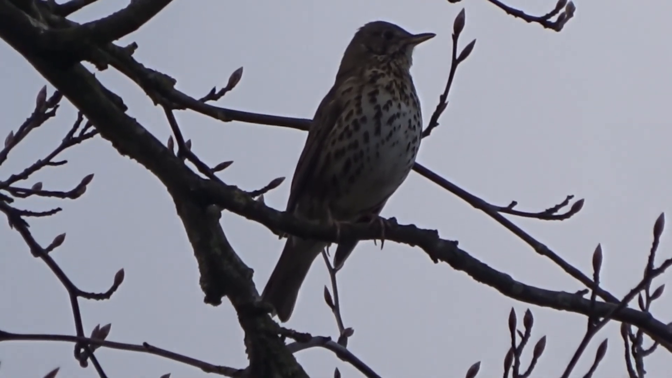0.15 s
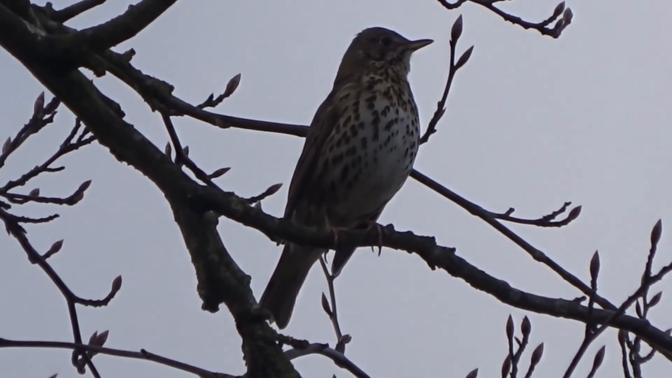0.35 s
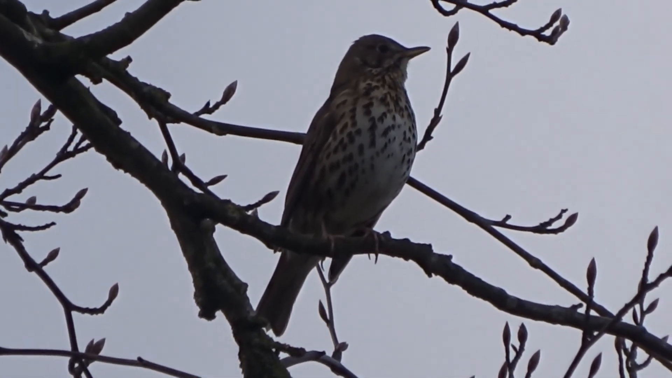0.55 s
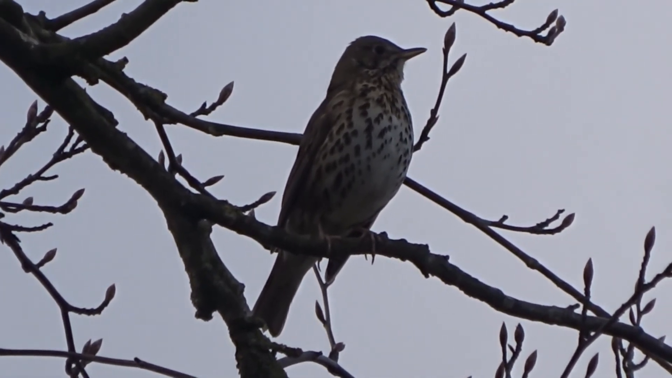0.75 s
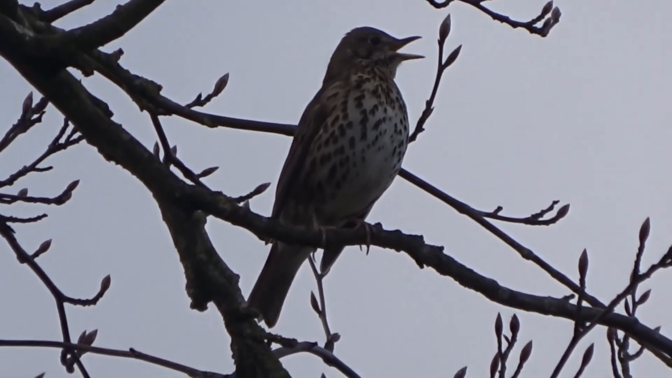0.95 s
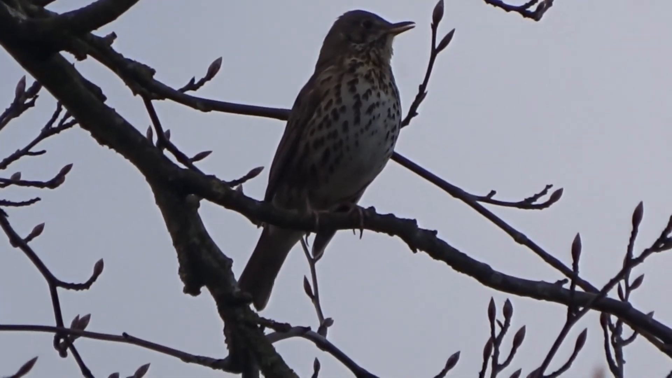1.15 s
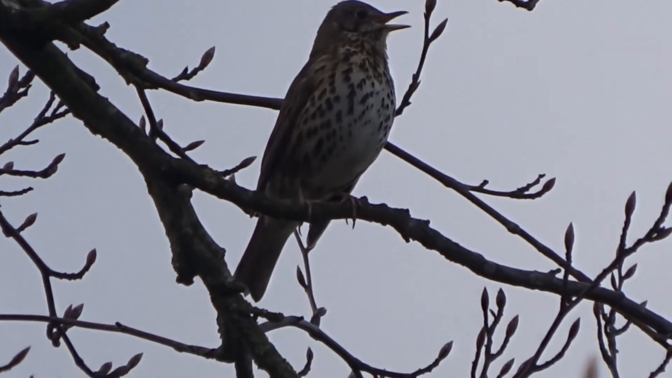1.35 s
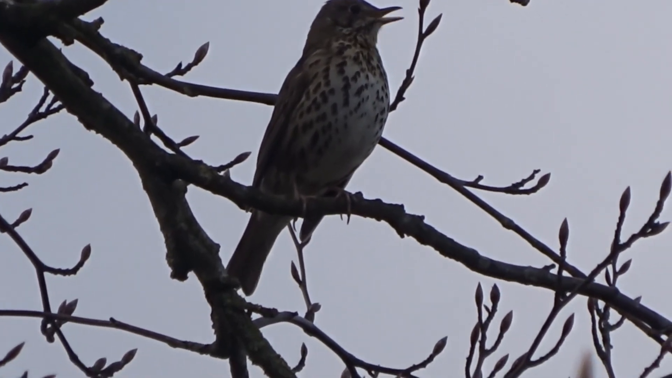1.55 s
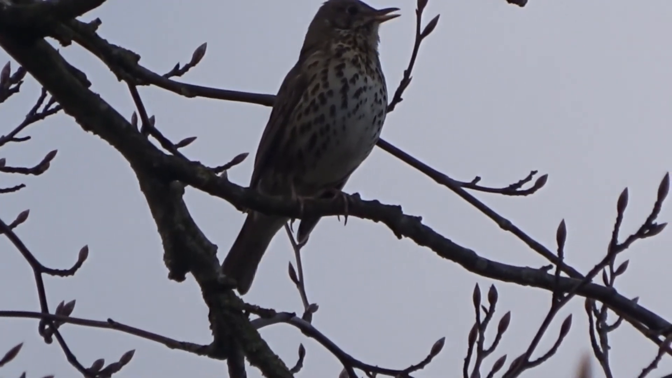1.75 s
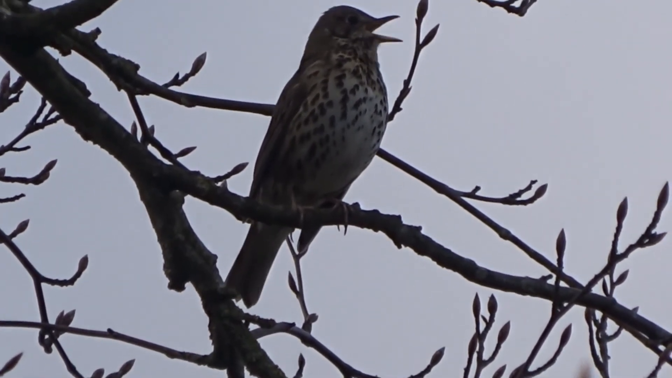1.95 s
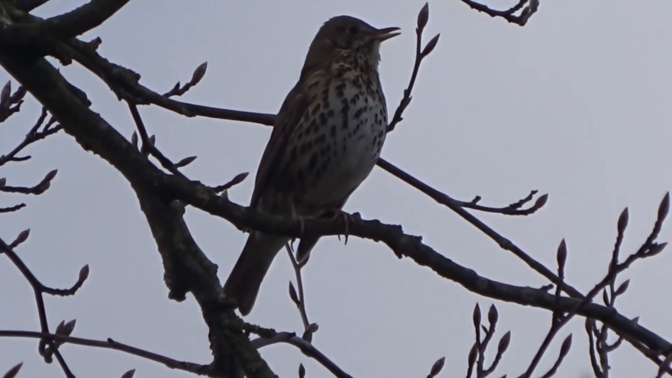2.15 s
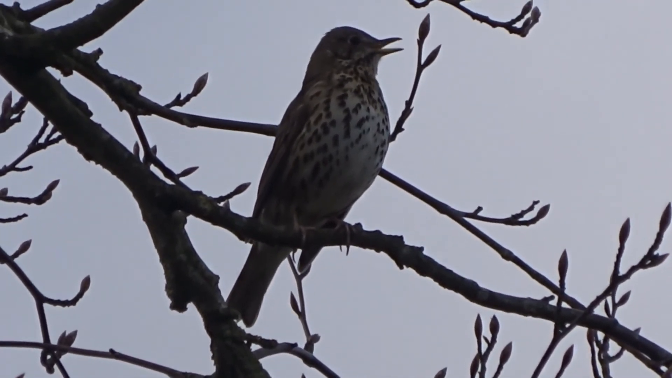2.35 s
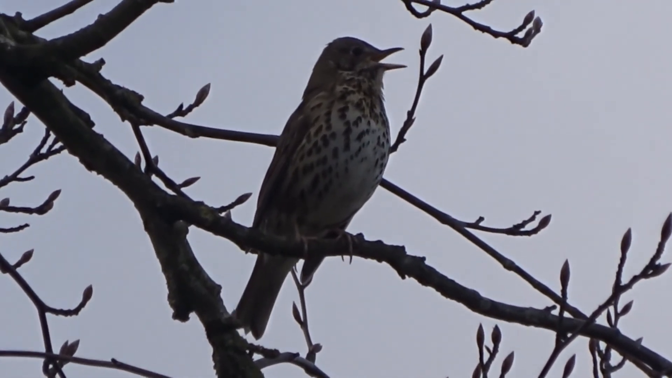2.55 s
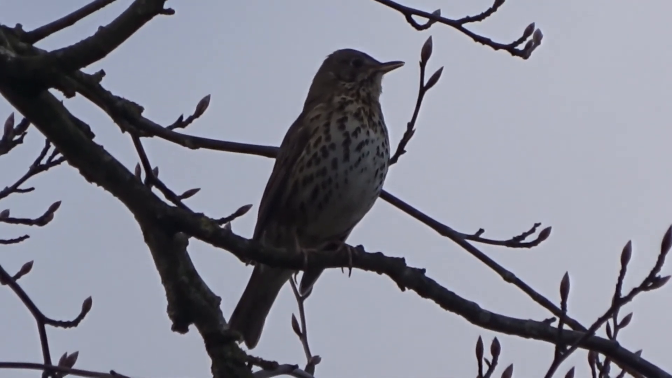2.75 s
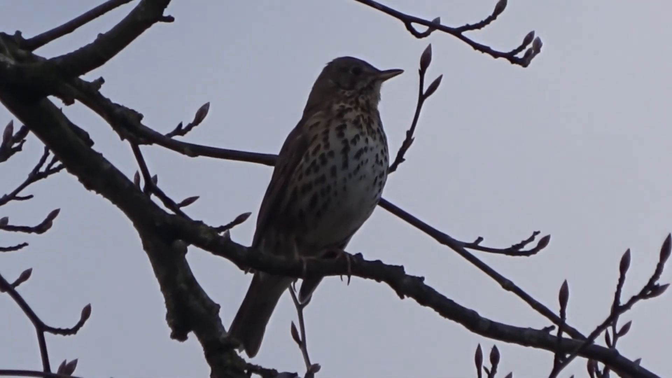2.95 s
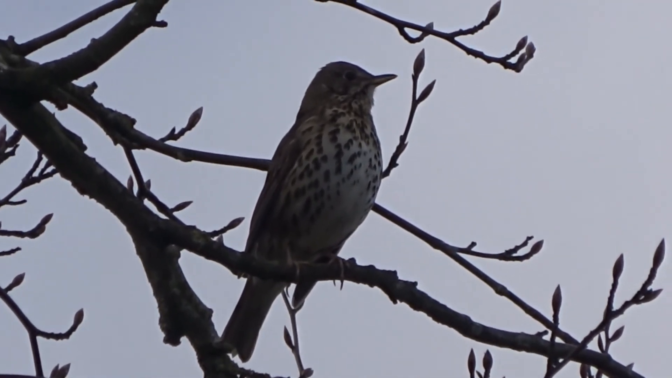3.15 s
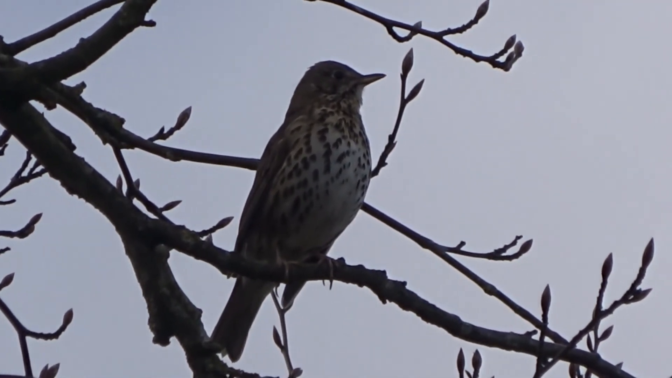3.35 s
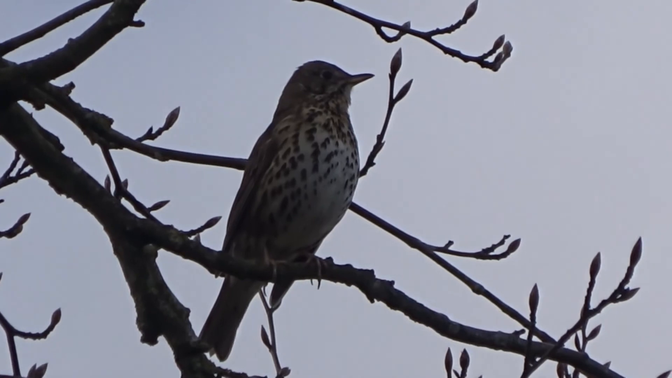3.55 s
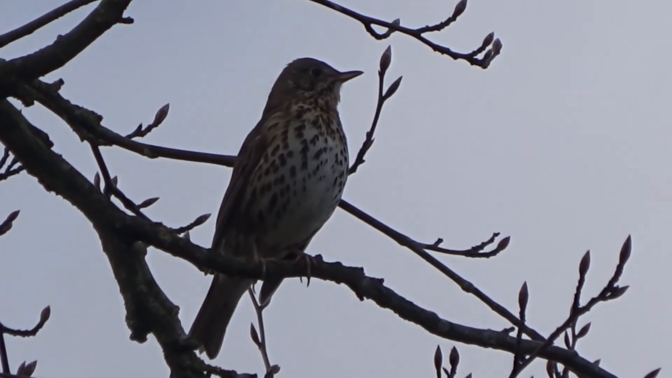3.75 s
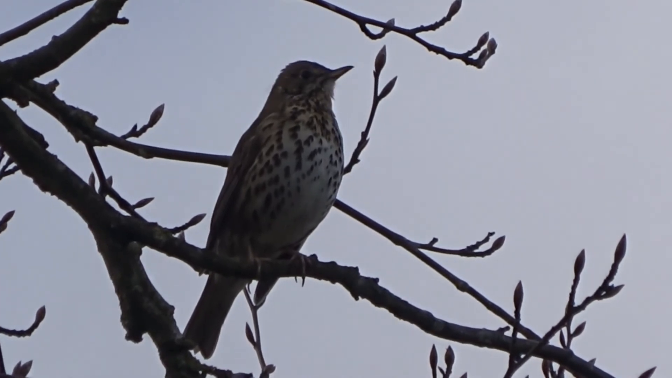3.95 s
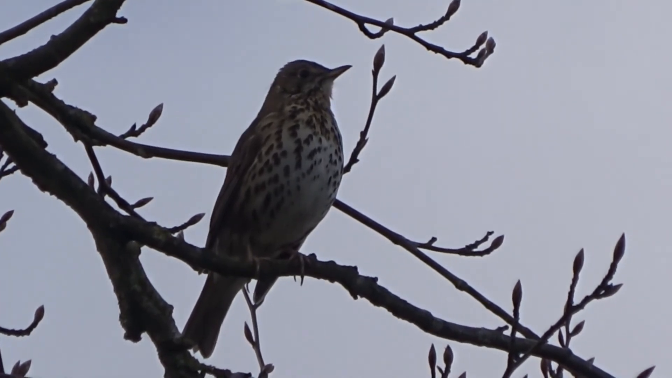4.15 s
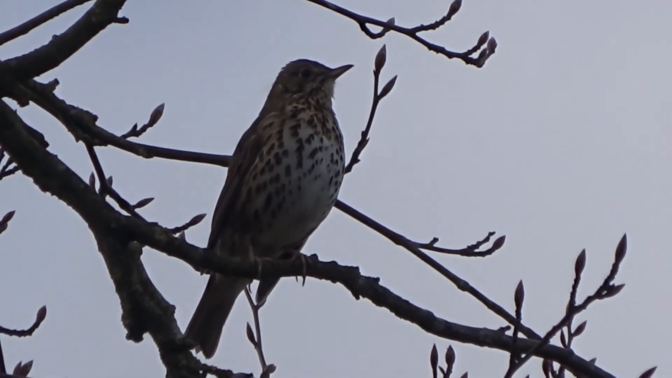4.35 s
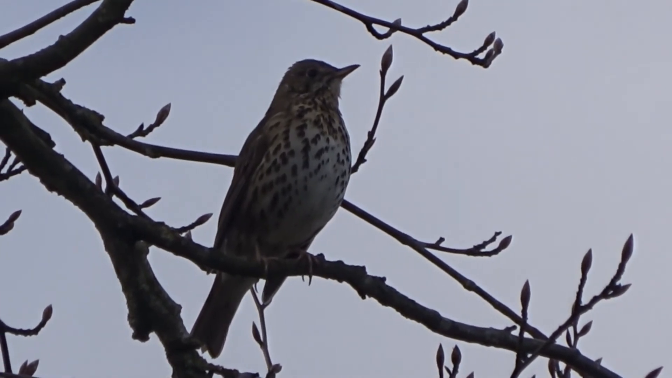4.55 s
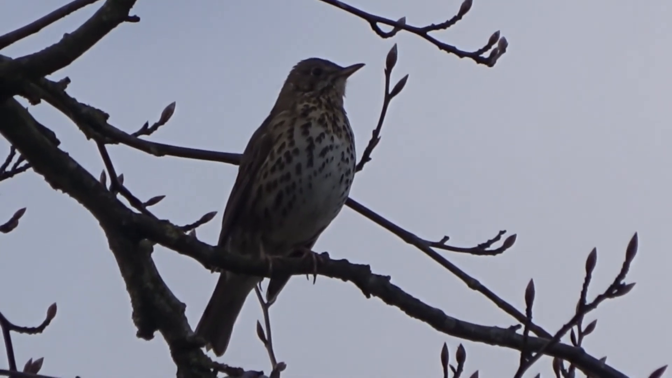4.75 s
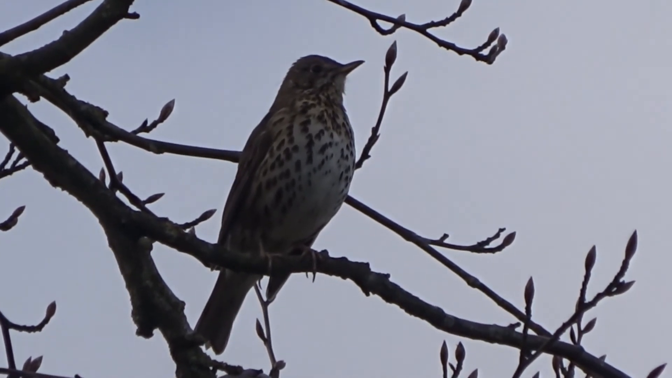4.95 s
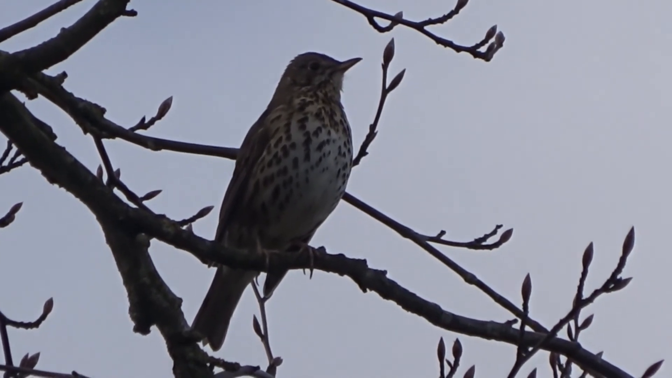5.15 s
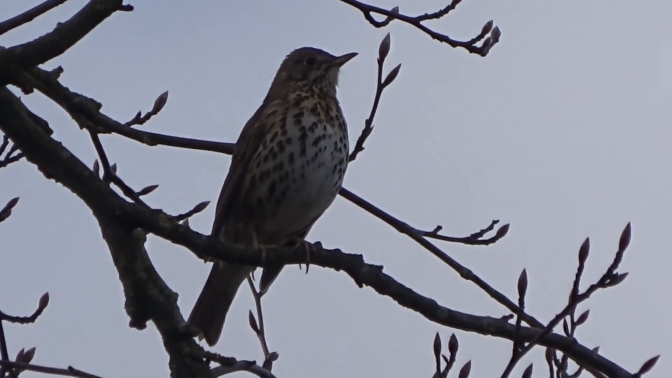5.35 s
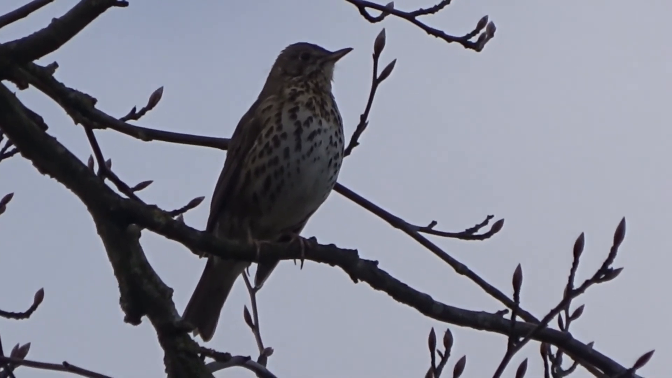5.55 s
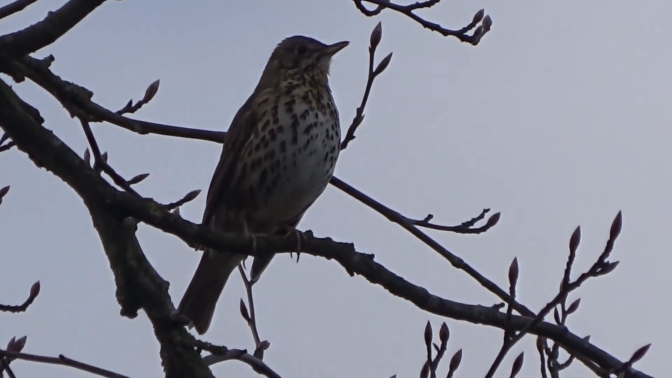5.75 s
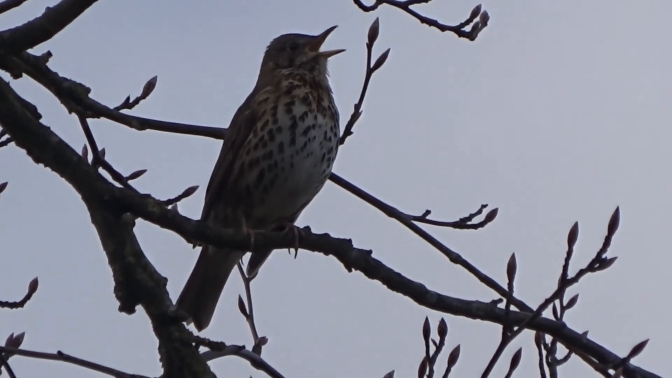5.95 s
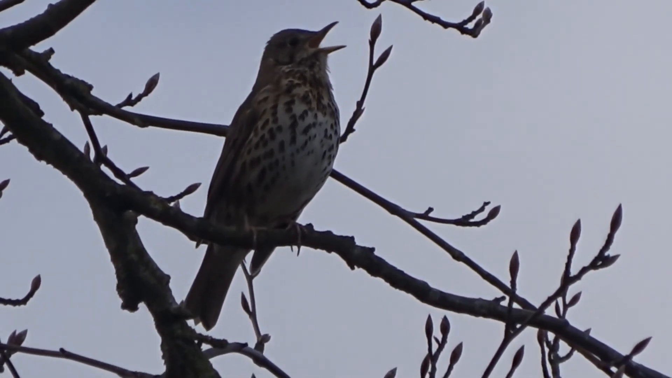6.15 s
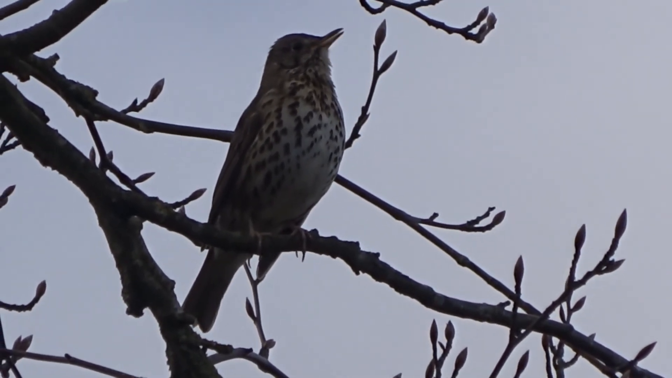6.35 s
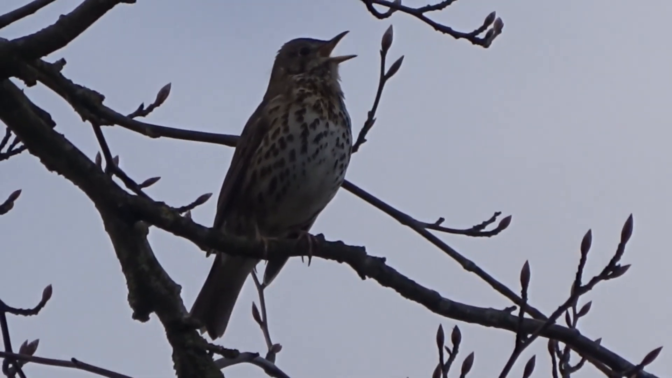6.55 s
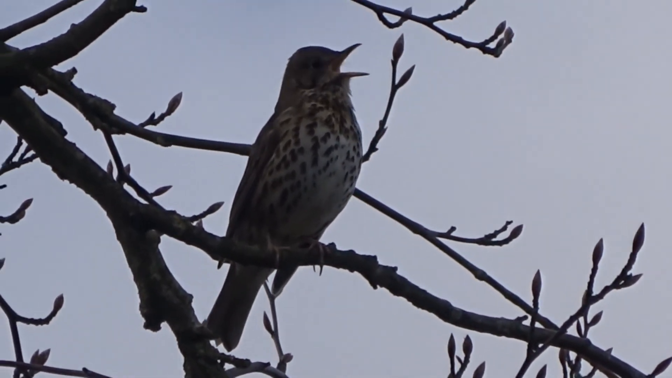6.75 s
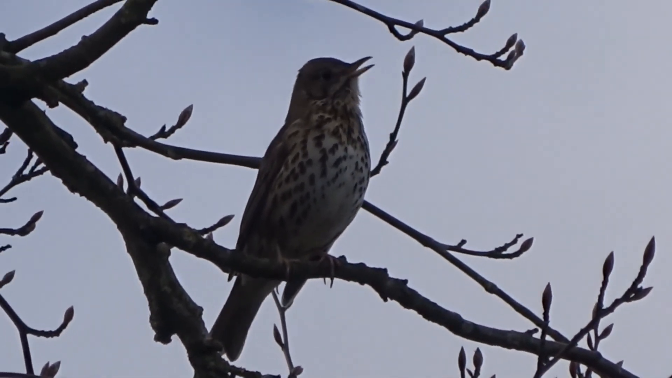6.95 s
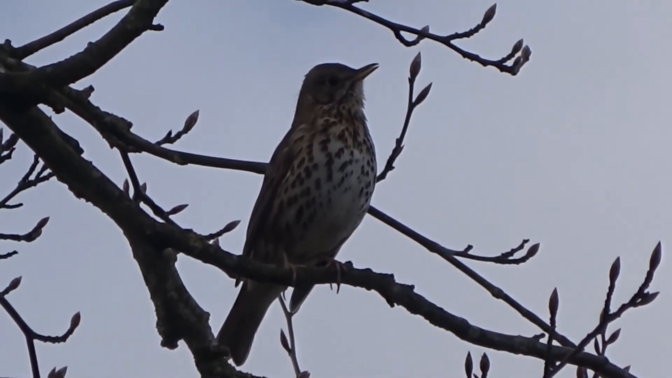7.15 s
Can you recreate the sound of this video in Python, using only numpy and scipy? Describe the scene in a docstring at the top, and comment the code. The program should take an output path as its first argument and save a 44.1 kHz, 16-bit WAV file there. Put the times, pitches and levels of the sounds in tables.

```python
"""A song thrush sings close by: two buzzing slurs, three sharp 'tew' notes, two long whistles,
from a two-sided syrinx whose pure tones gain overtones in throat and beak.
Other songbirds chirp as short glides and rattle as pulsed noise further off, and something snaps once.
Sparse noise echoes make the trees, over the shaped-noise hiss of distant traffic.
The camera cuts the bass and the very top, and whines faintly."""
import sys
import numpy as np
from scipy import signal
from scipy.fft import rfft, irfft
from scipy.io import wavfile
from scipy.ndimage import uniform_filter1d

SR = 44100
rng = np.random.default_rng(int(sys.argv[2]) if len(sys.argv) > 2 else 0)


def log_audio(samples):
    """Write samples as a 16-bit WAV file to the path given in sys.argv[1]."""
    # one column per channel
    frames = np.atleast_2d(samples).T
    # limit to full scale, then quantise
    limited = np.clip(frames, -1, 1)
    pcm = np.round(limited * 32767).astype(np.int16)
    wavfile.write(sys.argv[1], SR, pcm)


N = 317520
T = np.arange(N) / SR
LEFT_RIGHT = np.array([[1], [-1]])  # sign of a left/right difference in each channel


def undb(db):
    """Amplitude factor of a level in dB."""
    return 10 ** (np.asarray(db) / 20)


def curve(rows, t):
    """Straight lines through rows of (t/s, value)."""
    return np.interp(t, *np.transpose(rows))


def colour(points, hz):
    """Gain at each frequency, from (f/Hz, level/dB) points joined on a logarithmic pitch axis."""
    f, db = np.transpose(points)
    return undb(np.interp(np.log(np.maximum(hz, 1)), np.log(f), db))


def shaped(points, size):
    """Noise of unit rms whose spectrum follows the points."""
    spectrum = rfft(rng.standard_normal(size)) * colour(points, np.fft.rfftfreq(size, 1 / SR))
    x = irfft(spectrum, size)
    return x / x.std()


def wander(t, rate):
    """A random line with a new value rate times a second."""
    u = (t - t[0]) * rate
    count = int(u[-1]) + 2
    return np.interp(u, np.arange(count), rng.standard_normal(count))


def span(start, end):
    """Sample times between two moments, 4 ms at the least."""
    return T[max(int(start * SR), 0):int(max(end, start + .004) * SR)]


def add(track, t, x):
    """Mix x into the track at the times t."""
    track[np.rint(t * SR).astype(int)] += x


def turn(hz):
    """Running phase of a moving pitch."""
    return 2 * np.pi * np.cumsum(hz) / SR


def swell(t, attack_s, release_s):
    """Amplitude that rises, holds and falls over the times t."""
    return np.clip(np.minimum((t - t[0]) / attack_s, (t[-1] - t) / release_s), 0, 1)


def background(air_db=-46, drift_db=.5, whine_hz=15625, whine_db=-62):
    """Distant traffic and hiss as slowly drifting wide noise, and the camera's thin whine as a sine."""
    # spectrum of the air, relative: f/Hz, level per Hz/dB
    air_spectrum = [(180, -78), (300, -42.5), (507, -24), (763, -5.5), (991, 2.5), (1620, -0.5),
                    (2480, -8.5), (4320, -11.5), (4770, -13.5), (7300, -19), (14300, -24), (15000, -19.5)]
    # stereo width of the air: f/Hz, side minus mid/dB
    air_width = [(400, -12), (1300, -8), (10000, -20)]
    mid, side = shaped(air_spectrum, N), shaped(air_spectrum, N)
    side = irfft(rfft(side) * colour(air_width, np.fft.rfftfreq(N, 1 / SR)), N)
    air = (mid + side * LEFT_RIGHT) * undb(air_db + drift_db * wander(T, 2.1))
    return air + undb(whine_db) * np.sin(2 * np.pi * whine_hz * T)


def trees(x, wet_db, t60_s, gap_s, likeness, linger_db=-28, linger_t60_s=1.8):
    """Sparse random echoes off trunks and walls die away, duller than the song; far ones linger faintly."""
    t = span(0, 1)
    tail = np.exp(-np.log(1000) * t / t60_s)
    linger = undb(linger_db) * np.exp(-np.log(1000) * t / linger_t60_s)
    fade = (tail + linger) * (t > gap_s)
    # the high power leaves only a few strong grains
    grains = rng.standard_normal((2, len(t))) * rng.random((2, len(t))) ** 20
    mid, side = signal.sosfilt(signal.butter(2, 7500, fs=SR, output="sos"), grains * fade)
    pair = mid + np.sqrt(1 - likeness) * side * LEFT_RIGHT
    pair = pair / np.linalg.norm(grains[0] * fade)
    return undb(wet_db) * signal.fftconvolve(x[None], pair, axes=1)[:, :N]


def near_echo(x, lag_s=0.018, db=-17):
    """One clear reflection from the ground beats against the gliding notes."""
    return undb(db) * np.interp(T - lag_s, T, x, left=0)


def snap(start=2.502, crack_db=-23, crack_s=0.012, tail_db=-31, tail_s=0.16):
    """A dry, bassless crack and its duller scatter among the trunks: one noise under two decays."""
    out, t = np.zeros(N), span(start, start + 1)
    age = t - t[0]
    noise = shaped([(800, -10.5), (2800, 3.0), (6000, -5.0), (10000, -35.0)], len(t))
    dull = signal.sosfilt(signal.butter(1, 3500, fs=SR, output="sos"), noise)
    crack = undb(crack_db) * np.exp(-age / crack_s) * noise
    scatter = undb(tail_db) * np.exp(-age / tail_s) * dull
    add(out, t, crack + scatter)
    return signal.sosfilt(signal.butter(6, 720, "high", fs=SR, output="sos"), out)


def add_slur(track, start, length, from_hz, to_hz, db, rasp_hz, bend, ease=1, taper=.4, fade_db=0,
             flutter_db=2.0, waver=0.033):
    """A short glide, uneven in pitch and strength; ease > 1 starts it gently, bend > 1 ends it gently."""
    t = span(start, min(start + length, T[-1]))
    u = np.linspace(0, 1, len(t))
    glide = (1 - u ** ease) ** bend + waver * wander(t, 110)
    hz = to_hz + (from_hz - to_hz) * glide + rasp_hz * wander(t, 1500)
    level = undb(db - fade_db * u + flutter_db * wander(t, 82))
    add(track, t, level * signal.windows.tukey(len(t), taper) * np.sin(turn(hz)))


def twitter(count=260, level_db=-53, spread_db=3, foot_hz=3200, top_hz=4500, length_s=0.019):
    """Birds further off still: quick faint chirps at random, two in three of them rising."""
    out = np.zeros(N)
    for when, slow, high, way, loud in rng.random((count, 5)):
        length = length_s * (.5 + slow)
        start = when * (T[-1] - length)
        ends = np.array([foot_hz, top_hz]) * 2 ** ((high - .5) / 2)  # up to a quarter octave either way
        ends = ends if way < 2 / 3 else ends[::-1]
        db = level_db + spread_db * (2 * loud - 1)
        add_slur(out, start, length, *ends, db, rasp_hz=50, bend=1.82)
    return out


def second_thrush():
    """Deep among the trees: a harsh falling hiss, a short arch and a rasping drop, from jittered glides."""
    # glides of the motif: t after its start/s, length/s, first f/Hz, last f/Hz, level/dB
    motif_glides = [(0, 0.068, 7500, 6060, -42.5), (0.028, .04, 6700, 5470, -36),
                    (0.062, .027, 4050, 4400, -35), (.089, .054, 4095, 2850, -31.5)]
    # pitch jitter of each glide: f/Hz
    motif_rasps = [480, 150, 80, 140]
    # starts of the motif: t/s
    motif_starts = [2.047, 2.275, 2.525, 5.669, 5.907, 6.145]
    out = np.zeros(N)
    for start in motif_starts:
        for (lag, *glide), rasp_hz in zip(motif_glides, motif_rasps):
            add_slur(out, start + lag, *glide, rasp_hz, bend=2)
    return out


def rattles():
    """Trains of harsh, hissing noise pulses that grow over their first half."""
    # dry rattles: t/s, length/s, pulse rate/Hz, level/dB
    rattle_rows = [(.007, .1, 70, -30.5), (.139, .113, 71, -28), (.296, .118, 68.5, -28.2),
                   (2.921, .075, 80, -35.5), (3.069, .063, 80, -37), (3.197, .071, 80, -37.5)]
    out = np.zeros(N)
    rasp = shaped([(2200, -37.5), (3300, -2), (4900, 2.5), (5400, 10), (5900, 2.0), (6800, -3), (7600, -40)], N)
    for start, length, rate_hz, db in rattle_rows:
        t = span(start, start + length)
        pulses = .28 + np.sin(np.pi * rate_hz * (t - start)) ** 2
        growth = swell(t, attack_s=length / 2, release_s=0.015) ** 0.83
        add(out, t, undb(db) * growth * pulses / 2)
    return out * rasp


def far_birds(chirp_foot_hz=3200, chirp_top_hz=5100, chirp_s=0.025, hook_foot_hz=3400, hook_top_hz=4400,
              hook_s=0.0253, drop_s=0.0261, drop_ratio=.79):
    """Gliding sines: chirps loudest in mid-rise, soft hooks, falling notes, glides, whistles and a warble."""
    # steep S-shaped rising chirps: t of the steepest rise/s, level/dB
    chirp_rows = [(0.18, -32), (.283, -33), (1.13, -33.5), (1.166, -27.5), (2.066, -29.5), (2.227, -33),
                  (2.69, -41), (2.818, -39.5), (3.055, -34.5), (3.255, -35), (3.428, -34.5), (3.771, -36),
                  (3.878, -35.5), (3.994, -36.5), (4.456, -40), (4.543, -33.5), (4.712, -33),
                  (4.777, -32.5), (5.33, -31.5), (5.622, -30.5), (5.779, -28), (6.55, -34), (6.678, -35),
                  (6.802, -34.5), (6.989, -33), (7.012, -33), (7.16, -33), (7.183, -34)]
    # soft hooked calls: t/s, level/dB
    hook_rows = [(0.531, -46), (.606, -46), (.66, -44), (0.73, -40.5), (0.803, -40.5), (1.217, -40),
                 (3.342, -38.5), (3.461, -39), (3.692, -41.5), (3.718, -43.5), (3.818, -40.5), (3.932, -42),
                 (4.791, -39.5), (6.938, -42)]
    # quick falling notes: t/s, first f/Hz, level/dB
    drop_rows = [(2.693, 4760, -37.5), (2.733, 3650, -36.5), (2.805, 3510, -32.5), (2.879, 3230, -36),
                 (3.38, 5300, -44), (3.553, 3350, -38), (3.617, 3270, -40), (4.162, 3700, -42.5),
                 (4.284, 3200, -44), (4.355, 3190, -39), (4.442, 3110, -40.5), (5.255, 3660, -40),
                 (5.331, 3350, -44), (5.409, 3230, -41.5)]
    # glides of varied length and pitch, rising or falling: t/s, length/s, first f/Hz, last f/Hz, level/dB
    glide_rows = [(0.968, 0.024, 2810, 3430, -40), (1.02, .035, 6080, 6200, -46),
                  (1.278, 0.034, 6300, 6570, -36.5), (1.484, 0.083, 3480, 5320, -37),
                  (1.61, 0.024, 2990, 4180, -32.5), (2.897, 0.28, 2194, 2750, -49),
                  (3.356, 0.13, 1270, 1079, -46), (4.244, 0.072, 2600, 4330, -38.5),
                  (4.386, 0.027, 5400, 4200, -42), (4.468, 0.023, 4600, 4380, -40),
                  (4.625, 0.02, 6180, 6260, -45), (4.89, 0.035, 6410, 6700, -45),
                  (4.985, .018, 3520, 5170, -42), (4.995, 0.031, 5050, 5600, -42),
                  (4.997, 0.041, 4400, 5200, -35), (5.063, 0.022, 2970, 3680, -36),
                  (5.105, .09, 3200, 5260, -37.5), (5.233, 0.027, 2910, 4360, -33.5),
                  (6.078, 0.31, 2720, 2210, -45.5), (7.1, 0.028, 3280, 3780, -40.5)]
    # thin whistles that slide down and hold: t/s, length/s, first f/Hz, held f/Hz, level/dB
    thin_whistle_rows = [(0.647, 0.11, 5450, 5080, -49.5), (1.797, 0.16, 4910, 4493, -29.5),
                         (3.158, 0.18, 5070, 4844, -42.5), (5.362, 0.047, 6010, 5680, -36.5),
                         (5.42, .15, 5140, 4484, -33), (5.801, 0.14, 3000, 2770, -45.5),
                         (6.019, 0.12, 5100, 4784, -41.5)]
    # linked fall and rise of a smaller bird: t after its start/s, length/s, first f/Hz, last f/Hz, level/dB
    warble_glides = [(0, .023, 4250, 3266, -33), (.014, .034, 3217, 3970, -39.5)]
    # starts of the warble's figure: t/s
    warble_starts = [4.546, 4.603, 4.664, 4.728, 4.809]
    out = np.zeros(N)
    for middle, db in chirp_rows:
        add_slur(out, middle - chirp_s / 2, chirp_s, chirp_foot_hz, chirp_top_hz, db,
                 rasp_hz=65, bend=2.4, ease=2, taper=0.78, fade_db=2.5)
    for start, db in hook_rows:
        add_slur(out, start, hook_s, hook_foot_hz, hook_top_hz, db, rasp_hz=70, bend=2.3)
    for start, hz, db in drop_rows:
        add_slur(out, start, drop_s, hz, hz * drop_ratio, db, rasp_hz=90, bend=1.26)
    for row in glide_rows:
        add_slur(out, *row, rasp_hz=45, bend=1.4)
    for row in thin_whistle_rows:
        add_slur(out, *row, rasp_hz=15, bend=4, waver=0.0068)
    for start in warble_starts:
        for lag, *glide in warble_glides:
            add_slur(out, start + lag, *glide, rasp_hz=188, bend=2, ease=2)
    return out


def syrinx(phase, hz, gape_db):
    """A nearly pure tone; its weak overtones pass through throat and beak, more of them as the beak gapes."""
    # overtones at the source: multiple of the pitch, level/dB
    overtones = [(2, -15), (3, -31), (4, -37)]
    # what throat and beak pass of the overtones: f/Hz, gain/dB
    throat = [(5000, -5), (5850, -21), (6150, -27), (6550, -6), (9000, -24), (9950, -14.5), (10600, 4.5),
              (11800, 0.5), (12400, -5.5), (13200, -7), (14000, -22.5), (15500, -6)]
    over = 0
    for k, db in overtones:
        audible = k * hz < SR / 2  # nothing above the Nyquist limit
        over = over + undb(db) * colour(throat, k * hz) * audible * np.sin(k * phase)
    return np.sin(phase) + undb(gape_db) * over


def low_voice(t, hz, gape_db, jitter, halves=0, waver=0.0047, flutter_db=1.5):
    """The whistling side of the syrinx: rougher and richer when forced, at times with a line at 1.5 x pitch."""
    # brief dips where an echo partly cancels the held note: t/s, half width to 1/e/s, depth/dB
    echo_dips = [(2.066, 0.0089, 3.5), (2.116, 0.013, 10.5), (2.549, 0.005, 10.5), (2.59, 0.0081, 12),
                 (6.113, 0.015, 4.5), (6.2, 0.011, 3.5), (6.8, 0.029, 3.5)]
    forced_jitter = jitter * (1 + np.maximum(gape_db, 0) / 10)
    unsteady = waver * wander(t, 70.1) + forced_jitter * wander(t, 900)
    hz = uniform_filter1d(hz, size=90) * (1 + unsteady)  # smoothed over 2 ms
    phase = turn(hz)
    dips_db = sum(depth * np.exp(-((t - when) / width) ** 2) for when, width, depth in echo_dips)
    loss_db = dips_db + flutter_db * wander(t, 130)
    # the overtones keep their strength through the dips
    overtone_db = gape_db + loss_db + 2.3 * wander(t, 90)
    return undb(-loss_db) * syrinx(phase, hz, overtone_db) + halves * np.sin(phase + phase / 2)


def slur(start, crest_hz, fall_s, db, length_s=0.084, end_hz=2900, crest_s=0.0213, scoop_hz=230, scoop_s=0.0088,
         swell_s=0.046, soft_db=-26, gape_db=26, gape_s=0.042, shut_db=-12):
    """The low voice arches over and falls, growing louder and then purer as the beak closes."""
    t = span(start, start + length_s)
    age = t - t[0]
    arch = (crest_hz - end_hz) * np.exp(-((age - crest_s) / fall_s) ** 2)
    hz = end_hz + arch - scoop_hz * np.exp(-age / scoop_s)
    size = undb(db + soft_db * np.maximum(1 - age / swell_s, 0)) * swell(t, attack_s=0.0043, release_s=0.0049)
    beak_db = shut_db + gape_db * np.exp(-((age - crest_s) / gape_s) ** 2)
    return t, size * low_voice(t, hz, beak_db, jitter=0.002)


def buzz(start, pitch_hz, db, length_s=0.074, rate_hz=203, shake_hz=520, rasp_hz=120, throb=.33, settle_s=0.05,
         scoop_hz=1100, scoop_s=.007, sag_hz_per_s=900, gape_db=0):
    """The high voice scoops up and swells; its pitch is shaken in fast, rough scallops that slowly settle."""
    t = span(start, start + length_s)
    age = t - t[0]
    shake = 2 * np.abs(np.sin(turn(rate_hz * (1 + 0.09 * wander(t, 190))) / 2)) - 1
    arch = pitch_hz - scoop_hz * np.exp(-age / scoop_s) - sag_hz_per_s * age
    hz = arch + np.exp(-age / settle_s) * (shake_hz * shake + rasp_hz * wander(t, 1500))
    size = undb(db) * swell(t, attack_s=0.038, release_s=0.019) * (1 + throb * shake)  # strength throbs too
    return t, size * syrinx(turn(hz), hz, gape_db)


def tew(start, length, pitch_hz, db, lead_s=.031, lead_hz=3730, break_hz=3557, flick_hz=400, flick_s=0.0017,
        overshoot_hz=240, settle_s=0.0684, creep_hz_per_s=650, soft_db=-21, sag_db_per_s=38,
        catch=0.81, catch_s=0.0014, gape_db=-3, gape_db_per_s=60):
    """A high lead-in swells, flicks up, catches and breaks to a lower note that settles, then creeps up."""
    t = span(start - lead_s, start + length)
    before, after = np.maximum(start - t, 0), np.maximum(t - start, 0)
    flick = flick_hz * np.exp(-(before / flick_s) ** 2)
    lead = break_hz + (lead_hz - break_hz) * before / lead_s + flick
    settling = overshoot_hz * np.maximum(1 - after / settle_s, 0) ** 1.707
    held = pitch_hz + settling + creep_hz_per_s * np.maximum(after - settle_s, 0)
    level = undb(db + soft_db * (before / lead_s) ** 1.5 - sag_db_per_s * after)
    size = level * swell(t, attack_s=0.0095, release_s=0.017)
    size = size * (1 - catch * np.exp(-((t - start + 2 * catch_s) / catch_s) ** 2))  # just before the break
    hz = np.where(t < start, lead, held)
    return t, size * low_voice(t, hz, gape_db + gape_db_per_s * after, jitter=0.0025)


def whistle(start, length, crest_hz, trough_hz, lift_hz_per_s, db, scoop_from_hz=2190, scoop_s=.083, trough_s=.295,
            soft_db=-21, swell_s=0.021, sag_db_per_octave=22, split_db=-12, split_db_per_s=650,
            gape_db=-4, gape_db_per_s=17):
    """A hoarse start scoops up to a pure crest, sinks and softens as it brightens, and lifts at the end."""
    t = span(start, start + length)
    age = t - t[0]
    sinking = np.interp(age, [scoop_s, trough_s], [crest_hz, trough_hz])
    lift = lift_hz_per_s * np.maximum(age - trough_s, 0)
    scoop = (crest_hz - scoop_from_hz) * np.maximum(1 - age / scoop_s, 0) ** 2.3
    hz = sinking + lift - scoop
    soft_start_db = soft_db * np.maximum(1 - (age / swell_s) ** 2, 0)
    size = undb(db + soft_start_db - sag_db_per_octave * np.log2(crest_hz / hz))
    size = size * swell(t, attack_s=0.0011, release_s=0.042)
    hoarseness = undb(split_db - split_db_per_s * age)
    return t, size * low_voice(t, hz, gape_db + gape_db_per_s * age, jitter=0.0035, halves=hoarseness)


def thrush(coupling_db=30.5, buzz_lead_s=0.03, catch_lead_s=0.0055, catch_s=0.019, catch_from_hz=2850,
           catch_to_hz=3950, catch_db=-24):
    """One side of the syrinx whistles low; the other buzzes high and opens each whistle with an upward catch."""
    # buzzing slurs: t of the low voice/s, crest f/Hz, fall time/s, level/dB, buzz f/Hz, buzz level/dB
    slur_rows = [(1.067, 3560, 0.039, -10, 5217, -19), (1.387, 3440, .035, -13, 5118, -13.5)]
    # 'tew' notes: t of the pitch break/s, length after it/s, lowest f/Hz, level/dB
    tew_rows = [(1.704, 0.1, 2906, -5), (2.043, .13, 2925, -4.5), (2.498, 0.15, 2908, -5.5)]
    # long whistles: t/s, length/s, crest f/Hz, trough f/Hz, closing lift/(Hz/s), level/dB
    whistle_rows = [(5.926, 0.36, 3289, 2891, 594, -6.5), (6.598, 0.392, 3279, 2944, 1414, -5.5)]
    low, high = np.zeros((2, N))
    for start, *shape, buzz_hz, buzz_db in slur_rows:
        add(low, *slur(start, *shape))
        add(high, *buzz(start - buzz_lead_s, buzz_hz, buzz_db))
    for row in tew_rows:
        add(low, *tew(*row))
    # where both sides are driven at once in the slurs they shake each other and add a harsh sum tone
    treble = signal.butter(6, 9000, "high", fs=SR, output="sos")
    sum_tone = signal.sosfilt(treble, high * low ** 2)
    for start, *shape in whistle_rows:
        add_slur(high, start - catch_lead_s, catch_s, catch_from_hz, catch_to_hz, catch_db, rasp_hz=40, bend=0.78)
        add(low, *whistle(start, *shape))
    return low + high + undb(coupling_db) * sum_tone


def scene(lean_db=0.5):
    """The near thrush is dry, far birds carry more echo, the farthest most; all leans slightly left."""
    # where the far birds are heard: t/s, left minus right/dB
    bearing = [(0, -2.5), (3.2, 2), (3.8, 12), (4.7, -5.5), (5.4, -1)]
    song, far, faint = thrush(), far_birds() + rattles(), twitter() + second_thrush()
    near = song + near_echo(song) + trees(song, wet_db=-12.0, t60_s=0.31, gap_s=0.022, likeness=0.94)
    distant = (far + near_echo(far, lag_s=0.009, db=-12)) * undb(LEFT_RIGHT * curve(bearing, T) / 2)
    distant = distant + trees(far, wet_db=-6.0, t60_s=0.56, gap_s=0.0044, likeness=0.71)
    farthest = faint + trees(faint, wet_db=-4.0, t60_s=0.42, gap_s=0.0037, likeness=0.7)
    # left up and right down by the lean
    return (near + distant + farthest + snap() + background()) * undb(LEFT_RIGHT * lean_db)


def record(dry):
    """The camera cuts the bass and, steeply, the very top."""
    thin = signal.sosfilt(signal.butter(4, 260, "high", fs=SR, output="sos"), dry)
    return signal.sosfilt(signal.ellip(10, .2, 80, 15750, fs=SR, output="sos"), thin)


dry = scene()
out = record(dry)
log_audio(out)
```